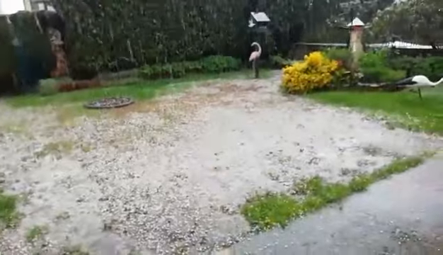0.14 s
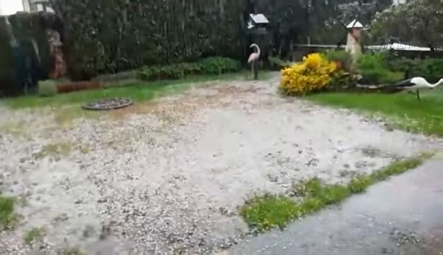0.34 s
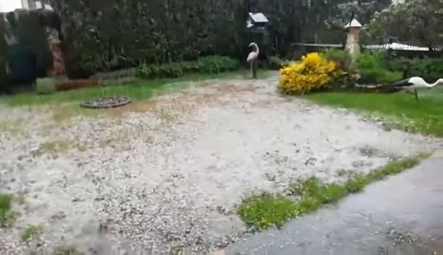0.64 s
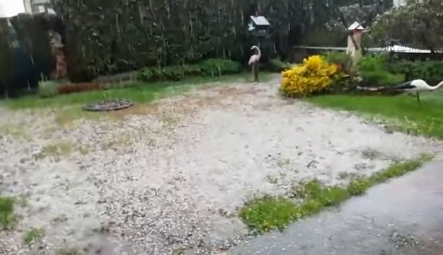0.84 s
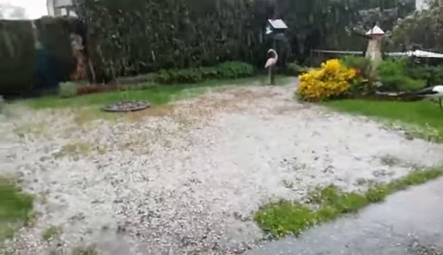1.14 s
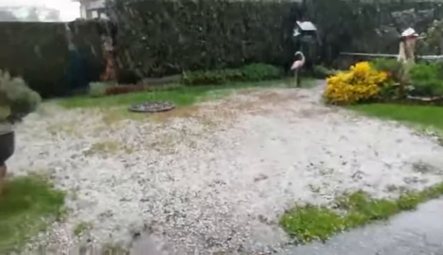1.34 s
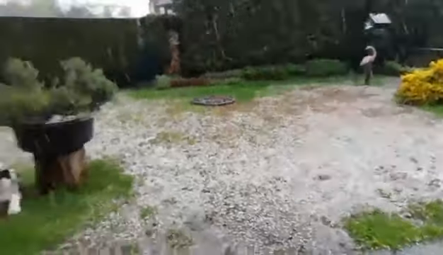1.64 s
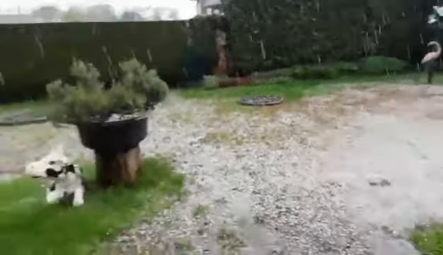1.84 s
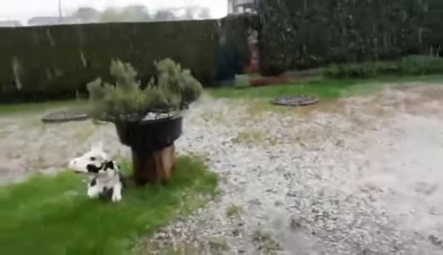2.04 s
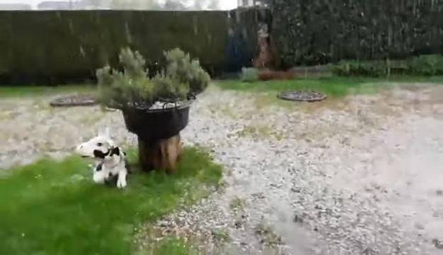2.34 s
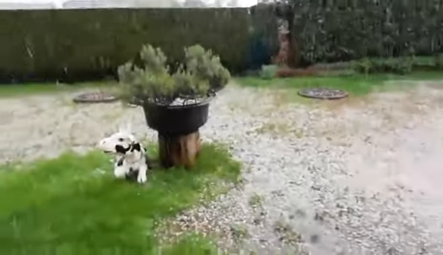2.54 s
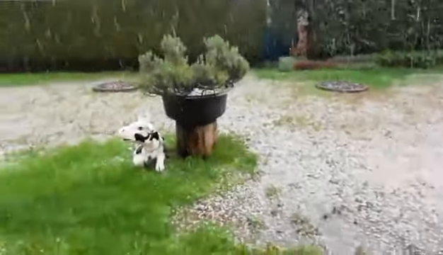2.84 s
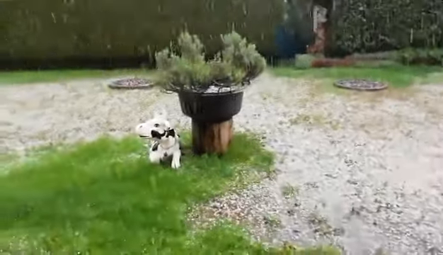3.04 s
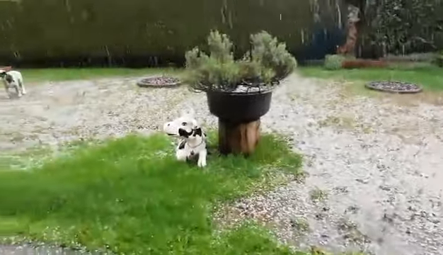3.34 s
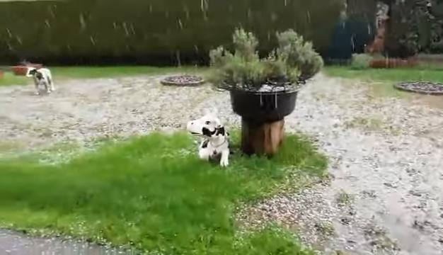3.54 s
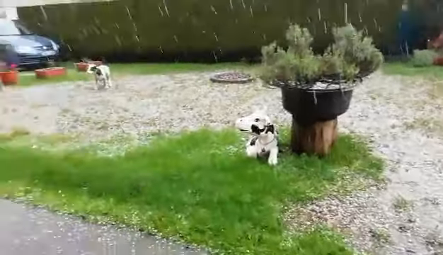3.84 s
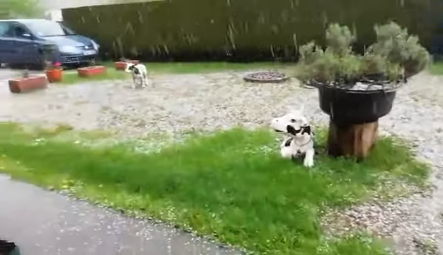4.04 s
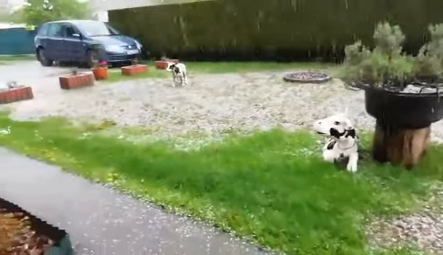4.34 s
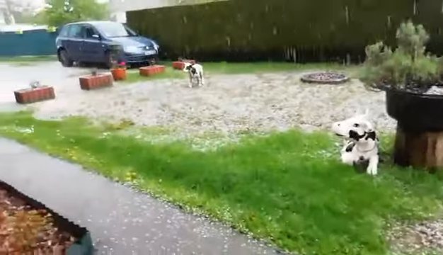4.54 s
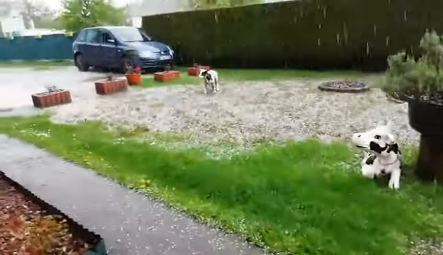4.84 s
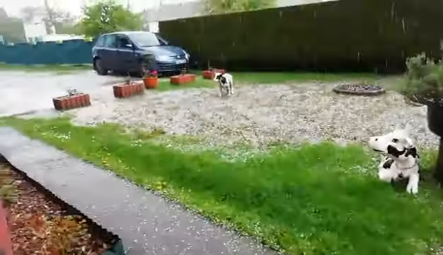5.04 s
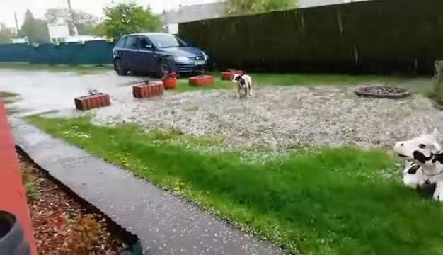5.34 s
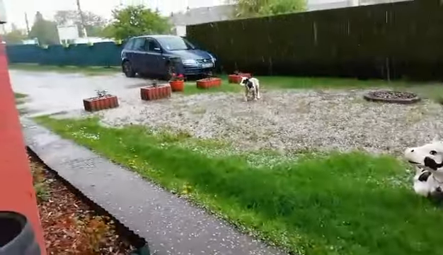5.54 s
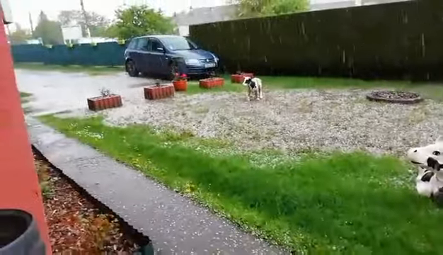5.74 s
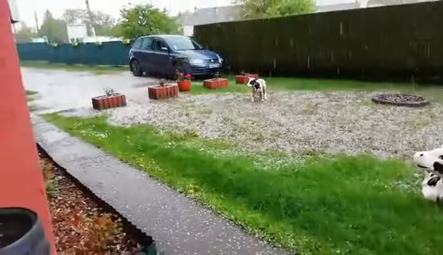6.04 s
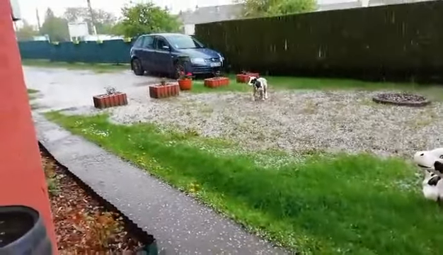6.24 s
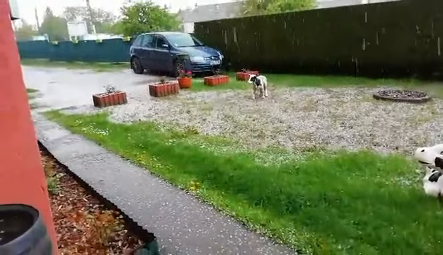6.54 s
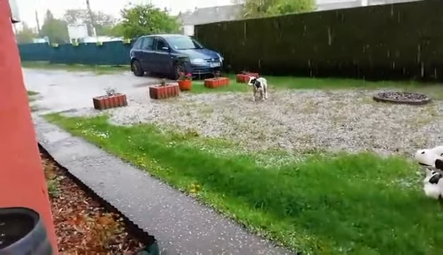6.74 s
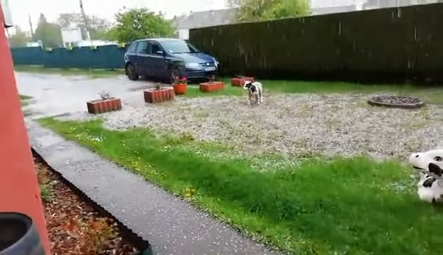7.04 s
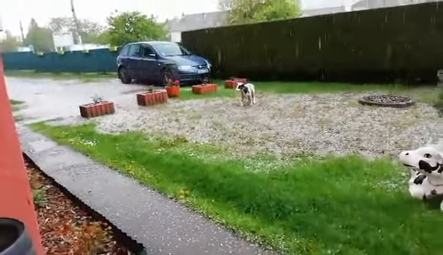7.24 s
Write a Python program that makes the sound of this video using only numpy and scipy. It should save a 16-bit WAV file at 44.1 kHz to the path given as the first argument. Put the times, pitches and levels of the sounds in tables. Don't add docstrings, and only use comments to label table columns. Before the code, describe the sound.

Hail and rain are already falling hard at 0 s and continue evenly to the end near 7.4 s, a dense bright hiss on gravel, grass and paving in an open garden. Over this far wash lie countless tiny crisp ticks nearby and a soft low rumble under a roof. Sharp splattering bursts land around 0.2-0.5 s. Thin metal rattles begin about 0.9 s and crowd together at 1.6-1.9 s with two strong splashes. Scattered pings and bursts follow, thickening at 3.4-4.5 s. Around 4.3 s the microphone turns towards a wall and the low hum weakens slightly. The loudest cluster of shattering stones comes at 5.0-5.8 s, then sparser hits at 6.1, 6.75 and 7.0 s. Handheld stereo sound, peaky, compressed and grainy, with a cut-off top.

```python
import sys
import numpy as np
from scipy import signal
from scipy.fft import rfft, irfft, next_fast_len
from scipy.io import wavfile
from scipy.ndimage import uniform_filter1d

SR = 44100
rng = np.random.default_rng(int(sys.argv[2]) if len(sys.argv) > 2 else 0)


def invert_db(level):
    return 10 ** (np.asarray(level, dtype=float) / 20)


def pcm_store(signal):
    levels = np.round(np.clip(np.atleast_2d(signal), -1, 1) * 32767)
    wavfile.write(sys.argv[1], SR, levels.astype(np.int16).T)


N = 326340

LAG = 27
TURN_S, TURN_TAKES_S = 4.3, 0.5


def evened(x):
    return x / np.sqrt(np.mean(x ** 2) + 1e-20)


def drift(shape, size):
    return evened(uniform_filter1d(rng.standard_normal(shape), size=size))


def read(points, hz):
    f, value = np.transpose(points)
    return np.interp(np.log(hz + 1), np.log(f + 1), value)


def add(mix, s, sound):
    part = mix[:, round(s * SR):][:, :sound.shape[1]]
    part += sound[:, :part.shape[1]]


def above(hz, corner_hz):
    return 1 / (1 + (corner_hz / (hz + 1)) ** 6)


def sides(lean_db):
    return invert_db(np.multiply.outer([0.5, -0.5], lean_db))


# pitch_hz, share_0_to_1
FROM_LEFT = [(300, 0.5), (700, 0.23), (1500, 0), (2000, 0), (2600, 0), (3300, 0), (9000, 0)]


def wash(patchy_db=1.41, gusty_db=-0.24):
    frames, hz = N // 256 + 5, np.fft.rfftfreq(1024, 1 / SR)
    a, b, c, d, p, q = rng.standard_normal((frames, 513, 6)).T
    patches = uniform_filter1d(np.array([p, q]), size=14, axis=1)
    patches = evened(uniform_filter1d(patches, size=10, axis=2))
    gusts = drift((2, frames), 9)
    left, other = a + 1j * b, c + 1j * d
    around = 1 - 1 / (1 + (330 / (hz + 1)) ** 5) - 0.006
    late = np.exp(-2j * np.pi * hz * LAG / SR)
    same = around + read(FROM_LEFT, hz) * late * above(hz, 350)
    same = (same / np.maximum(abs(same), 1))[:, None]
    right = same * left + np.sqrt(np.maximum(1 - abs(same) ** 2, 0)) * other
    unrest_db = above(hz, 650)[:, None] * (patchy_db * patches + gusty_db * gusts[:, None])
    z = np.array([left, right]) * invert_db(unrest_db)
    return evened(signal.istft(z, nperseg=1024, noverlap=768)[1][:, :N])


def patter(per_s=1500, spread_db=3.0):
    size = invert_db(spread_db * np.minimum(rng.exponential(1, N), 5))
    size = size * (rng.random(N) < per_s / SR)
    kind, t, out = rng.integers(0, 24, N), np.arange(600) / SR, np.zeros((2, N))
    for k, hz in enumerate(np.geomspace(2700, 11000, 24)):
        tick = np.sin(2 * np.pi * hz * t) * np.exp(-t * hz / 3.9)
        train = signal.oaconvolve(size * (kind == k), tick * np.sqrt(hz / 4000))[:N]
        out[k % 2] += train
        out[1 - k % 2] += 0.21 * np.roll(train, LAG)
    return evened(signal.lfilter(*signal.butter(2, 1200, "high", fs=SR), out))


# start_s, strength_db, hail_over_rain_db
SHOWER = [(0.0, -22.5, -7.5), (0.35, -22, -8), (0.62, -23, -8.5), (0.99, -23, -5.5), (1.67, -21.5, -9),
          (1.79, -22, -6), (1.85, -23, -7), (2.35, -22.5, -7), (3.09, -22.5, -7), (3.4, -24, -6),
          (3.44, -21.5, -6), (3.58, -22, -8), (4.31, -23.5, -7.5), (5.32, -22.5, -9), (6.28, -23.5, -8.5),
          (7.13, -24, -8.5), (7.38, -23, -8.5), (7.4, -22, -6)]
FIZZ_FOLLOWS, PATTER_FOLLOWS, RUMBLE_FOLLOWS = 1.36, 1.6, 0.77
FLURRY_DB, FLURRY_S = 1, 0.043
HUM_HZ, HUM_WIDTH_HZ, HUM_SHADE_DB = 183, 40, -5
RUMBLE_SHADE_DB, LEAN_SHADE_DB = -1, -0.7


def shower_db(t, hz):
    s, strength, hail = np.transpose(SHOWER)
    strength = np.interp(t, s, strength - strength.mean())
    hail = np.interp(t, s, hail - hail.mean())
    turned = np.tanh((t - TURN_S) / TURN_TAKES_S) / 2
    flurry = FLURRY_DB * drift((2, len(t)), max(round(FLURRY_S * SR / 512), 1))
    fizz = FIZZ_FOLLOWS * strength + flurry[0]
    grains = PATTER_FOLLOWS * strength + flurry[1] + hail
    rumble = RUMBLE_FOLLOWS * strength + RUMBLE_SHADE_DB * turned
    high, mid, low = (above(hz, corner_hz)[:, None] for corner_hz in (4200, 1300, 270))
    level_db = high * fizz + (mid - high) * grains + 0.52 * (low - mid) * grains + (1 - low) * rumble
    hum = np.exp(-((hz - HUM_HZ) / HUM_WIDTH_HZ) ** 2)
    level_db = level_db + HUM_SHADE_DB * np.outer(hum, turned)
    return level_db + np.multiply.outer([0.5, -0.5], mid * LEAN_SHADE_DB * turned)


def steady_shower():
    rain = wash() + invert_db(-10) * patter()
    hz, t, z = signal.stft(rain, SR, nperseg=1024)
    return signal.istft(z * invert_db(shower_db(t, hz)), SR, nperseg=1024)[1][:, :N]


def spray(t60, rise_s, clumpy_db):
    t = np.arange(9000) / SR
    clumps = drift((2, 9000), 60)
    tail = invert_db(-60 * t / max(t60, 0.02)) + 1.1 * invert_db(-60 * t / 0.041)
    rise = 1 - np.exp(-t / (rise_s * np.array([[1], [5.0]])))
    return rise * tail * invert_db(clumpy_db * clumps) * rng.standard_normal((2, 9000))


# start_s, level_db (peak), pitch_hz
PINGS = [(0.854, -16.5, 2410), (1.2396, -16, 2400), (1.3275, -12, 2400), (1.4497, -25, 2310),
         (1.5394, -18, 1940), (1.6208, -9.5, 2490), (1.6791, -12.5, 2470), (1.725, -11.5, 2400),
         (1.7561, -8.5, 1990), (1.789, -8, 2420), (1.854, -16.5, 2430), (1.906, -12, 2270),
         (2.1197, -17, 2600), (2.396, -13.5, 2520), (2.47, -14, 2230), (2.7343, -19.5, 2400),
         (3.0081, -22, 2300), (3.269, -13, 2350), (3.4224, -13.5, 2460), (3.4564, -12.5, 2000),
         (3.736, -15.5, 2500), (3.8282, -14, 2210), (3.991, -14, 1950), (4.1084, -19, 2090),
         (4.48, -11.5, 2250), (5.399, -13, 2550), (5.6111, -17, 2380), (6.1649, -15, 2160),
         (6.4068, -27, 2210), (7.0477, -17.5, 2210)]
PING_T60_S, PING_DB, PING_LEAN_DB, PING_CLATTER_DB = 0.29, 15.5, 2.5, -10.5
PING_RING_DB, PING_RING_Q = -0.5, 30


def sheet():
    out, wide = np.zeros((2, N)), signal.butter(2, [2600, 5200], "band", fs=SR)
    for s, db, hz in PINGS:
        blow = spray(PING_T60_S, 0.00065, 0.78)[0]
        rattle = signal.lfilter(*signal.iirpeak(hz, 5.0, SR), blow)
        clatter = invert_db(PING_CLATTER_DB) * signal.lfilter(*wide, blow)
        ring = invert_db(PING_RING_DB) * signal.lfilter(*signal.iirpeak(hz, PING_RING_Q, SR), blow)
        ping = rattle + clatter + ring
        both = np.array([ping, np.roll(ping, LAG)])
        add(out, s, invert_db(db + PING_DB) * sides(PING_LEAN_DB)[:, None] * both)
    return out


# start_s, level_db (peak), left_right_db, t60_s
SPLASHES = [(0.24, -11, 4.5, 0.17), (0.4294, -9, 2, 0.22), (0.4988, -6, 1, 0.42), (1.045, -20, 5, 0.19),
            (1.477, -10, 3, 0.13), (1.6716, -5, 7, 0.31), (1.7543, -5, 7, 0.17), (2.197, -7, 5.0, 0.14),
            (2.57, -9, 8, 0.16), (3.0975, -20, 2.0, 0.17), (3.4111, -8, 2, 0.17), (3.5314, -9, 6, 0.17),
            (3.84, -9, 0, 0.17), (3.9666, -9, 11, 0.23), (4.0136, -7, -1, 0.15), (4.1593, -24, -2, 0.14),
            (4.4883, -7, -4, 0.13), (5.0195, -4.5, 7.0, 0.17), (5.2609, -5, 5, 0.08),
            (5.3468, -1.5, 3, 0.22), (5.405, 0, 6.5, 0.11), (5.457, -1.5, 10, 0.22),
            (5.7464, -10, 16, 0.44), (5.8341, -2.5, 9.5, 0.27), (5.9806, -13, 14, 0.15),
            (6.133, -5, -6, 0.15), (6.2277, -10, 21, 0.16), (6.7531, -2.5, -7, 0.12),
            (7.0063, -6.5, 5.0, 0.13), (7.1561, -7, 3.5, 0.17)]
SPLASH_DB, SPLASH_LEAN_DB = 7.5, -6


def splashes():
    out, bright = np.zeros((2, N)), signal.butter(4, 5800, "high", fs=SR)
    for s, db, lean_db, t60 in SPLASHES:
        burst = signal.lfilter(*bright, spray(t60, 0.0014, 2.2))
        add(out, s, invert_db(db + SPLASH_DB) * sides(lean_db + SPLASH_LEAN_DB)[:, None] * burst)
    return out


def scene():
    return steady_shower() + splashes() + sheet()


# pitch_hz, level_db (per Hz)
BASS = [(20, -79), (45, -78), (90, -70.5), (150, -69), (192, -67), (240, -70.5)]
# pitch_hz, level_db (per Hz)
LEFT_PORT = [(400, -72), (900, -66), (1750, -61), (2000, -56), (2400, -55), (3300, -64.5), (4600, -59),
             (5600, -61), (7100, -56.5), (7800, -51.5), (9000, -56), (10500, -67.5), (11500, -71),
             (12800, -75.5)]
RIGHT_PORT = [(400, -74.5), (900, -67), (1600, -69), (2100, -70), (3300, -68), (4600, -67.5), (5800, -68.5),
              (7500, -62.5), (8900, -55), (9700, -61), (10500, -66.5), (11500, -71), (12800, -76)]


def through_ports(dry):
    size = next_fast_len(N + 4096)
    hz = np.fft.rfftfreq(size, 1 / SR)
    colour = invert_db([read([*BASS, *port], hz) for port in (LEFT_PORT, RIGHT_PORT)])
    colour = colour * np.sqrt(SR / 2) * (hz < 12950)
    return irfft(rfft(dry, size) * colour, size)[:, :N]


DUCK_ABOVE_DB, DUCK_SHARE, RECOVER_DB_PER_S = -18.5, 0.25, 21


def duck(x):
    power = uniform_filter1d((x ** 2).mean(0), size=500, origin=249)
    power_db = 10 * np.log10(abs(power) + 1e-12)
    fall = np.arange(N) * RECOVER_DB_PER_S / SR
    held_db = np.maximum.accumulate(power_db + fall) - fall
    over_db = np.maximum(held_db - DUCK_ABOVE_DB, 0)
    return x / invert_db(DUCK_SHARE * uniform_filter1d(over_db, size=600, origin=299))


def overload(x, knee=0.55, ceiling=0.9):
    over, room = np.maximum(abs(x) - knee, 0), ceiling - knee
    return x - np.sign(x) * (over - room * np.tanh(over / room))


# pitch_hz, level_db
GATE = [(300, -18), (1700, -9.5), (2600, -7), (3300, 2), (4000, -3.5), (5800, -2), (7500, -9.5),
        (9000, -7.5), (10200, 0), (11200, 3), (12000, 4.5), (12900, 5)]


def starve(x, top_hz=12300, sway_hz=850, band_db=2.5, own=0.85):
    lead, window = 797, np.sqrt(signal.windows.hann(2048, sym=False))
    hz, t, z = signal.stft(np.pad(x, ((0, 0), (lead, 0))), SR, window, 2048)
    paired = uniform_filter1d(rng.standard_normal(len(t)), size=3) > 0

    def swap(v):
        return np.where(paired, np.array([v[0] + v[1], v[0] - v[1]]) / np.sqrt(2), v)

    z = swap(z)
    near = uniform_filter1d(uniform_filter1d(abs(z) ** 2, size=25, axis=1), size=5, axis=2)
    usual_db = 10 * (own * np.log10(near + 1e-20) + (1 - own) * np.log10(near.mean(0) + 1e-20))
    frames = drift(len(t), 2)
    bands = drift((2, 65, len(t)), 3).repeat(16, axis=1)[:, :len(hz)]
    blocks = drift((65, len(t)), 3).repeat(16, axis=0)[:len(hz)]
    kept = hz[:, None] // 345 * 345 < top_hz + sway_hz * (frames + 0.5 * blocks)
    waver_db = band_db * bands + 0.7 * np.tanh(t - TURN_S)
    step = 2 * invert_db(usual_db + read(GATE, hz)[:, None] + waver_db)
    z = kept * z / (abs(z) + 1e-20) * step * np.round(abs(z) / step)
    return signal.istft(swap(z), SR, window, 2048)[1][:, lead:lead + N]


def band_limit(x):
    return signal.sosfilt(signal.butter(12, 13910, fs=SR, output="sos"), x)


def record(dry):
    mix = starve(overload(duck(through_ports(dry))))
    return band_limit(mix)


dry = scene()
out = record(dry)
pcm_store(out)
```